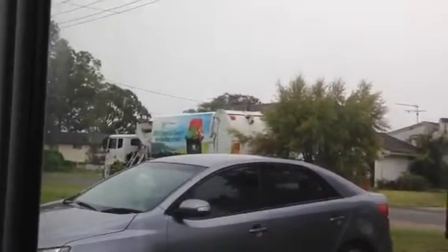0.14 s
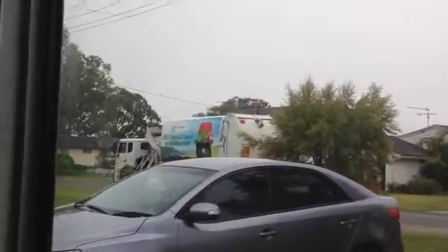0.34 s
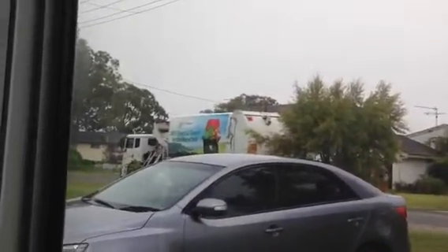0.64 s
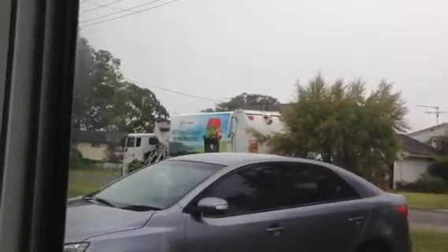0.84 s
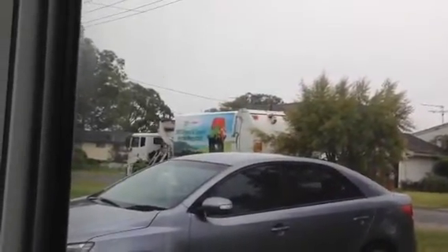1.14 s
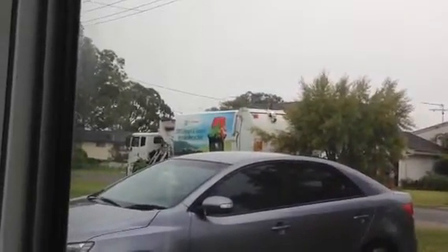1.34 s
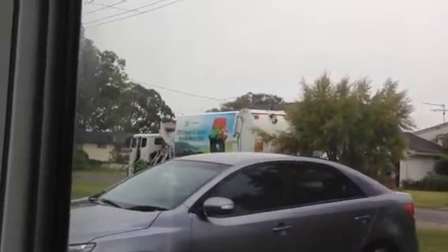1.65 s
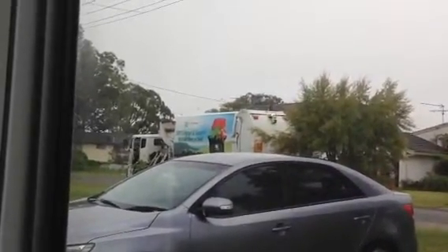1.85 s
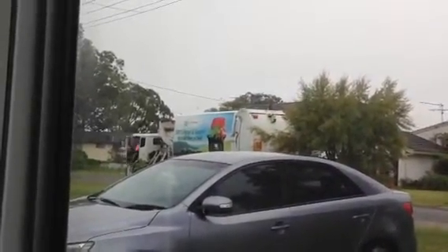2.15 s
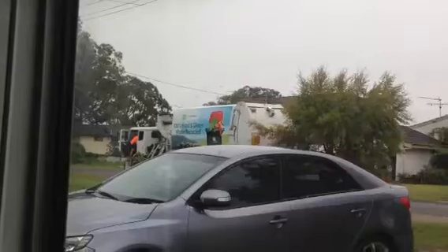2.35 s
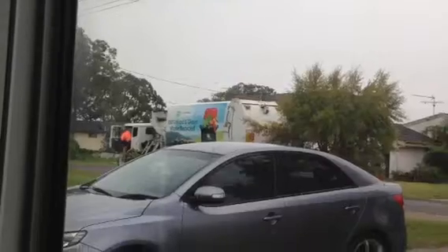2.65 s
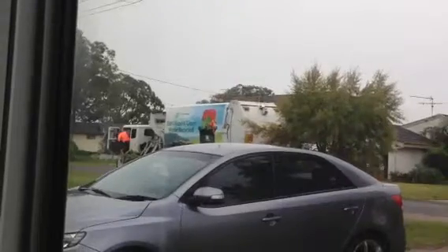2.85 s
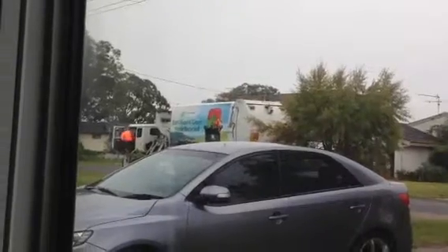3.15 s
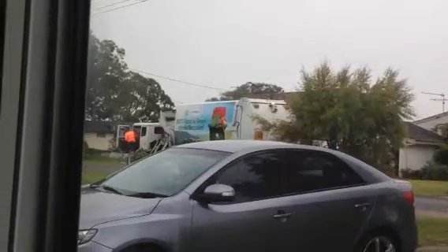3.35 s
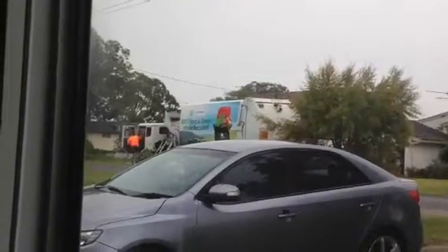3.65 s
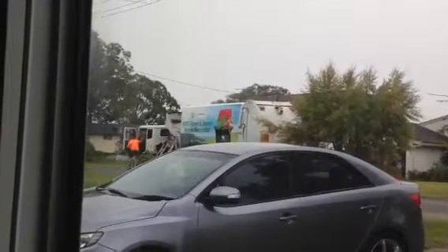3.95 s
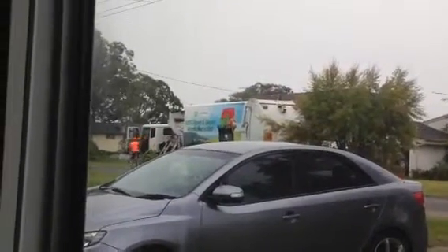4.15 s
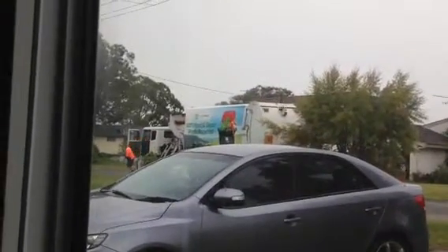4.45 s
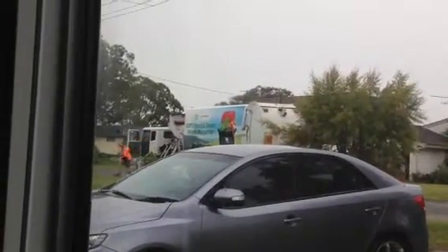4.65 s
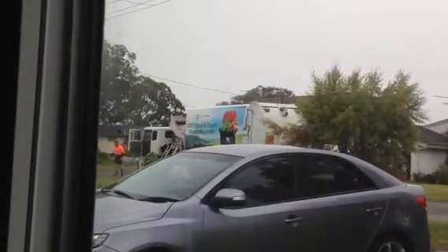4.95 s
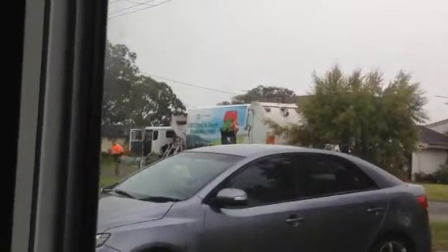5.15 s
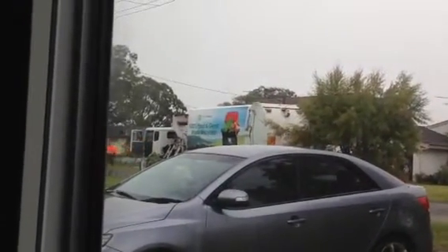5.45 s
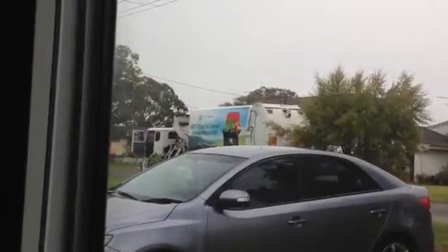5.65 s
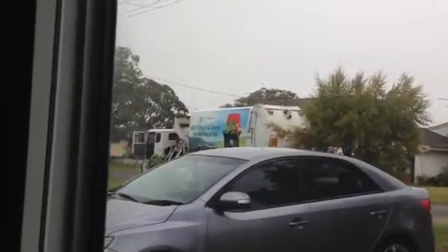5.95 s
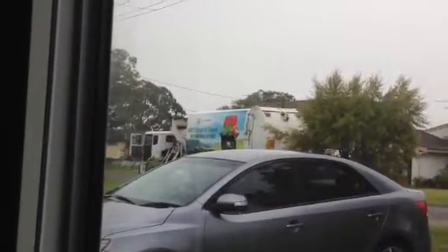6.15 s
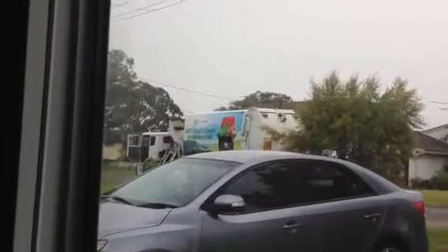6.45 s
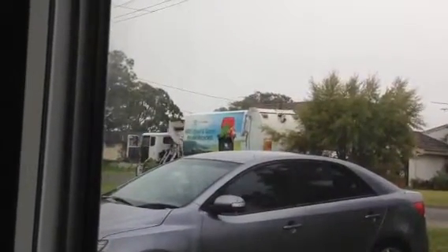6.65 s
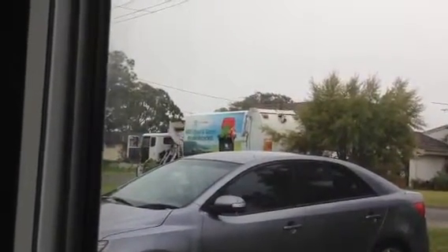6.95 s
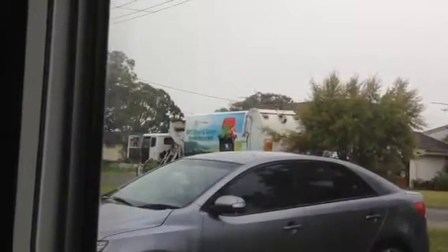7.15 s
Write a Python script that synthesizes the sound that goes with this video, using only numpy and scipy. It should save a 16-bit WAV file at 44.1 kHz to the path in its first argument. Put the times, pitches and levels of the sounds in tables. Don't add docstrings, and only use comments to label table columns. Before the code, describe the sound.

Low engine drone and fan roar, a sharp half-second blast of brake air near the start, then steady diesel idling with faint ticks and squeaks.

```python
import sys
import numpy as np
from scipy import signal
from scipy.fft import rfft, irfft, next_fast_len
from scipy.io import wavfile

SR = 44100
rng = np.random.default_rng(int(sys.argv[2]) if len(sys.argv) > 2 else 0)


def linear_from_db(decibels):
    return 10 ** (np.asarray(decibels, float) / 20)


def waveform_to_disk(signal):
    frames = np.transpose(np.atleast_2d(signal))
    scaled = np.clip(frames, -1, 1) * 32767
    samples = np.round(scaled).astype(np.int16)
    wavfile.write(sys.argv[1], SR, samples)


N = 321930
TIME = np.arange(N) / SR
SIZE = 2 * next_fast_len(N // 2 + 1)
FREQS = np.maximum(np.arange(SIZE // 2 + 1) * SR / SIZE, 1)


def rms_one(x):
    return x / np.sqrt(np.mean(x ** 2) + 1e-20)


def in_time(rows):
    s, *columns = np.transpose(rows)
    return [np.interp(TIME, s, column) for column in columns]


def drift(rate_hz):
    size = N // 30 + 1
    slowing = 1 + (np.arange(size // 2 + 1) * SR / N / rate_hz) ** 2
    slow = irfft(rfft(rng.standard_normal(size)) / slowing, size)
    return np.interp(TIME, np.linspace(0, N / SR, size), rms_one(slow))


def swells(rows, rise_db_per_s, fall_db_per_s):
    levels_db = []
    for s, hold_s, top_db in rows:
        before = np.maximum(s - TIME, 0)
        after = np.maximum(TIME - s - hold_s, 0)
        levels_db.append(top_db - rise_db_per_s * before - fall_db_per_s * after)
    return linear_from_db(np.max(levels_db, axis=0))


def colour(points, peaks):
    hz, level_db = np.transpose(points)
    db = np.interp(np.log(FREQS), np.log(hz), level_db)
    for peak_hz, width_hz, top_db in peaks:
        db = db + top_db / (1 + (2 * (FREQS - peak_hz) / width_hz) ** 2)
    return linear_from_db(db)


def band(low_hz, high_hz):
    return 1 / np.sqrt((1 + (low_hz / FREQS) ** 12) * (1 + (FREQS / high_hz) ** 12))


def noise(gain):
    return rms_one(irfft(rfft(rng.standard_normal(SIZE)) * gain, SIZE)[:N])


def wavering(hz, width_hz, rough_db):
    turns = np.cumsum(hz + width_hz * drift(47.2)) / SR
    return np.sqrt(2) * np.sin(2 * np.pi * turns) * linear_from_db(rough_db * drift(41))


def ring(clicks, hz, t60_s):
    r = linear_from_db(-60 / (t60_s * SR))
    w = 2 * np.pi * hz / SR
    return signal.lfilter([0, np.sin(w)], [1, -2 * r * np.cos(w), r * r], clicks + 1e-18)


# (delay t/s, level/dB)
ECHOES = [(.0047, -14), (.0113, -9.5), (.0191, -15), (.0307, -13.5), (0.0442, -12.5)]


def street_ripple():
    return np.abs(1 + sum(linear_from_db(db) * np.exp(-2j * np.pi * FREQS * s) for s, db in ECHOES))


# (t/s, crank turns per minute)
IDLE_SPEED = [(0.0, 837.0), (0.9, 838.4), (2.1, 847.3), (3.3, 848.9), (4.2, 846.8), (5.1, 836.1),
              (5.5, 838.4), (5.8, 869.2), (6.1, 853.1), (6.35, 862.0), (6.8, 839.3), (7.3, 844.3)]


def crank():
    first_cycle = -.09
    return first_cycle + np.cumsum(in_time(IDLE_SPEED)[0]) / SR / 120


def still_air():
    air = linear_from_db(-76) * noise(band(16, 64))
    return air + linear_from_db(-67) * noise(band(7000, 17400) / FREQS ** .6)


def looped(cycle, size=6250):
    patterns, turn = rng.standard_normal((2, size)), 1.42 * drift(0.42)
    place = ((cycle % 1) * size).astype(int)
    return np.cos(turn) * patterns[0, place] + np.sin(turn) * patterns[1, place]


# (f/Hz, level/dB per Hz)
ROAR = [(39, -27), (66, -1), (140, 0), (168, -4), (206, -9), (318, -10), (349, -9), (723, -11),
        (775, -17.5), (973, -7), (1340, -9.5), (1640, -9.5), (3110, -11), (6030, -14.5), (15400, -49)]
# (f/Hz, width/Hz, level/dB)
HOLLOWS = [(207, 25, 4), (292, 12, 4), (318, 20, -6), (422, 25, 5), (505, 30, -7), (850, 15, -5),
           (720, 25, 5), (1040, 150, 4), (1310, 30, -4), (1405, 30, -5), (1760, 35, -5), (1825, 45, 4),
           (2030, 80, 2), (2470, 40, 4), (2690, 80, -3), (2805, 50, 4), (3800, 200, 3), (4940, 60, 2),
           (5860, 60, 3), (7000, 200, 4), (7250, 300, -3), (9440, 80, 2)]


def roar(cycle):
    shape = street_ripple() ** 0.36 * colour(ROAR, HOLLOWS)
    fresh = rfft(rng.standard_normal(SIZE))
    again = rfft(looped(cycle), SIZE)
    edges_hz = [62, 130, 300, 900, 1530, 2540, 4500, 8000, 17000]
    band_levels_db = [0.58, -0.22, -1.25, -2.6, 3.47, -0.87, -1.53, 1.0]
    breathing_db = [0, 0, .3, .6, 1.4, 1.6, 1.2, .8]
    repeating = [.2, .25, .4, .35, .2, .1, .05, 0]
    out = 0
    for low, high, db, depth_db, share in zip(edges_hz, edges_hz[1:], band_levels_db, breathing_db, repeating):
        breath_db = depth_db * np.cos(4 * np.pi * (cycle - .02))
        swell = linear_from_db(db + breath_db + 0.54 * drift(3.9))
        source = np.sqrt(1 - share) * fresh + np.sqrt(share) * again
        out = out + swell * irfft(source * shape * (FREQS >= low) * (FREQS < high), SIZE)[:N]
    level_db = -47.5 + .15 * TIME
    return linear_from_db(level_db) * rms_one(out)


# (t/s, hold t/s, level/dB)
PUMP = [
    (.1, 0.092, -55),
    (.7, 0.092, -59),
    (3.0, 1.4, -61.5),
    (4.95, 0.8, -58),
    (7.0, 0.43, -57),
]


def pump():
    return swells(PUMP, 30.0, 40.0) * wavering(146.5, 1.1, rough_db=1.4)


def intake(cycle):
    breath = linear_from_db(3.0 * np.cos(4 * np.pi * (cycle - .02)))
    reed = noise(band(3825, 3885) * colour([(20, 0), (20000, 0)], [(3853, 60, 30)]))
    return swells([(1.7, 4.4, -65)], 40.0, 40.0) * breath * reed


# (t/s, f/Hz, level/dB)
TURBINE = [
    (1.8, 5790, -70),
    (3.5, 5840, -80),
    (4.8, 5970, -69),
    (5.6, 6310, -76),
    (7.3, 6176, -86),
]


def turbine():
    hz, db = in_time(TURBINE)
    return linear_from_db(db) * (TIME > TURBINE[0][0]) * wavering(hz, 19.2, rough_db=3.0)


# (t/s, level/dB)
DRONE = [(.13, -49), (.31, -53), (.56, -54), (.73, -52), (1.5, -53), (1.871, -57), (2.02, -57),
         (2.31, -53.5), (2.559, -57), (2.901, -55.5), (3.3, -56), (3.528, -53.5), (3.829, -52),
         (4.34, -56.5), (4.6, -55), (4.88, -50), (5.651, -55), (5.99, -54.5), (6.23, -51.5), (6.46, -54),
         (6.57, -58.5), (7.02, -57.5)]
# (t/s, hold t/s, level/dB)
PUFFS = [
    (5.96, 0.2, -50.5),
    (6.2, 0.13, -55),
    (6.42, 0.03, -46.5),
    (6.53, .01, -55),
]


def pipe():
    drone = swells([(s, .03, db) for s, db in DRONE], 75.0, 98.0) * wavering(208, 7.3, rough_db=2.8)
    return drone + swells(PUFFS, 400.0, 526.0) * wavering(102, 3.5, rough_db=1.5)


# (t/s, hold t/s, level/dB)
SQUEAK = [
    (5.83, .02, -51),
    (5.93, 0.018, -51),
    (6.08, .01, -59),
    (6.225, .02, -50.5),
]


def belt():
    return swells(SQUEAK, 280.0, 350.0) * wavering(2025, 20.3, rough_db=1.6)


# (t/s, peak level/dB)
CLACK = [
    (.0805, -41),
    (.0835, -36),
    (.0862, -30),
    (.0985, -40),
]


def valve_clack():
    clicks = np.zeros(N)
    for s, db in CLACK:
        clicks[round(s * SR)] = linear_from_db(db - 28)
    metal = [(2420, -2, .016), (2200, 0, .018), (1950, -1, .018), (1350, -12, .06)]   # (f/Hz, level/dB, t60/s)
    return sum(linear_from_db(db) * ring(ring(clicks, hz, t60), hz, .008) for hz, db, t60 in metal)


# (order per cycle, level/dB under the tone, lead in turns)
ORDERS = [(12, -12.5, -0.5), (14, -39, 0.16), (18, -18.5, -0.18), (24, -38, -0.57), (27, -17, -0.18),
          (30, -18.5, -0.47), (32, -23, 0.29), (33, -23, 0.47), (36, -19, -0.12), (42, -24.5, 0.29),
          (46, -48, 0.83), (48, -26, -0.054), (51, -28.5, -0.12), (52, -29, -0.44), (60, -27, 0.28),
          (84.7, -26.5, 0.057), (116, -24.5, 0.38)]


def exhaust(cycle, tone_db):
    hum = np.cos(2 * np.pi * 6 * cycle)
    waver = linear_from_db(1.0 * drift(4))
    for order, db, lead in ORDERS:
        own = np.roll(waver, 2500 * round(order))
        hum = hum + linear_from_db(db) * own * np.cos(2 * np.pi * (round(order) * cycle + lead))
    return np.sqrt(2) * linear_from_db(tone_db) * hum


# (share of cycle, level/dB into each of the four block modes, level/dB of broad tick)
CONTACTS = [(.07, 0, 4, -5, -3, -3), (.22, 3, 4, -5, -8, -4), (.32, -6, -3, -1, 1, -3),
            (.39, 3, 4, -9, -7, -2), (.44, -8, -8, 4, 6, 0), (.50, -8, -8, 6, 5, 1), (.56, 5, 3, 5, 1, -1),
            (.65, -12, -1, -2, -4, -2), (.83, -2, -8, 1, 0, -2), (.92, -12, -2, 2, 3, 2)]
# (level/dB, t60/s)
BLOCK = [
    (5.5, 0.096),
    (0.5, 0.081),
    (3, 0.077),
    (3.5, 0.072),
    (3, 0.0088),
]
BLOCK_HZ = [997, 1086, 1590, 1700, 2200]
# (order per cycle, level/dB to the clatter)
GEARS = [
    (141, -6),
    (154, -14),
    (225, -12),
    (241, -12),
]


def clatter(cycle, sump_db, head_db):
    jitter_s, uneven_db = .00005, 1.5
    table = np.tile(CONTACTS, (54, 1))
    due = table[:, 0] + np.arange(len(table)) // len(CONTACTS) - 1
    when = np.interp(due, cycle, TIME)
    luck = rng.standard_normal((len(table), 1 + len(BLOCK)))
    at = np.clip(((when + jitter_s * luck[:, 0]) * SR).astype(int), 0, N - 1)
    heard = (at > 0) & (at < N - 1)
    modes = []
    for k, (hz, (db, t60)) in enumerate(zip(BLOCK_HZ, BLOCK), 1):
        clicks = np.zeros(N)
        clicks[at] = heard * linear_from_db(db + table[:, k] + uneven_db * luck[:, k])
        modes.append(ring(ring(clicks, hz, t60), hz, .014))
    whine = []
    for order, db in GEARS:
        tone = np.sin(2 * np.pi * order * cycle + .7 * drift(4))
        whine.append(linear_from_db(db + 2.0 * drift(4)) * tone)
    sump = rms_one(sum(modes[:2])) + sum(whine[:2])
    head = rms_one(sum(modes[2:])) + sum(whine[2:])
    return linear_from_db(sump_db) * sump + linear_from_db(head_db) * head


# (t/s, firing tone level/dB, sump clatter level/dB, head clatter level/dB)
EFFORT = [(0, -45, -58.5, -59.5), (1.2, -45, -60.5, -57), (2.3, -46, -55.5, -54),
          (3.6, -46.5, -54.5, -53.5), (4.9, -45, -60, -55.5), (5.5, -44.5, -56.5, -55.5),
          (5.8, -45.5, -51, -56.5), (6.1, -47, -53, -56), (6.4, -49, -49.5, -55), (6.75, -45.5, -60, -54),
          (7.3, -45, -62, -59)]


def engine(cycle):
    tone_db, sump_db, head_db = in_time(EFFORT)
    return exhaust(cycle, tone_db) + clatter(cycle, sump_db - 1.0, head_db + 0.18)


# (t/s, hold t/s, level/dB)
SEEP = [
    (.08, 0.018, -45),
    (.25, 0.026, -48),
    (.42, .18, -52),
]
# (t/s, hold t/s, level/dB)
SPIT = [
    (.42, .01, -55),
    (.75, .08, -61.5),
]


def brake_leaks():
    out = swells(SEEP, 160.0, 230.0) * noise(band(1930, 1950.0))
    out += swells(SPIT, 400.0, 75.0) * noise(band(3060.0, 11000) / FREQS)
    start_s = 1.46
    whistle_hz = 1912 + 12 * (TIME - start_s)
    out += swells([(start_s, 1.2, -55)], 80.0, 250.0) * wavering(whistle_hz, 5, rough_db=1.8)
    return out


# (f/Hz, level/dB per Hz)
JET = [(150, -39), (250, -2), (287, 8), (335, -3), (534, -20), (728, -26), (959, -24.5), (1140, -29.5),
       (1750, -13.5), (2430, -6.5), (2940, -11.5), (3430, -2), (5950, -2.5), (9810, -6), (15400, -19)]
# (f/Hz, width/Hz, level/dB)
NOZZLE = [(1810, 60, 3), (2350, 150, 4), (3550, 120, 2), (4150, 300, 2), (5950, 400, 3)]
# (t/s, level/dB)
VALVE = [
    (.80, -65),
    (.845, -42),
    (.866, -22),
    (.895, -19.5),
    (.98, -23.5),
    (1.005, -18),
    (1.22, -19),
    (1.345, -21.5),
    (1.39, -35),
]
# (share level/dB, change as tank empties dB/s, answer to sizzle dB, dying after shut-off dB/s)
JET_PARTS = [
    (-8, -0.5, 1.5, 32),
    (-6, 3.5, -5.5, 59),
    (-5, -4.5, 5, 70),
    (-6, -8.5, -1, 68),
]
# (t/s, hold t/s, level/dB)
PANEL = [
    (.90, 0.04, -30),
    (1.025, 0.0082, -32),
    (1.075, .065, -34),
    (1.2, 0.023, -29.5),
    (1.3, 0.036, -49),
    (1.45, 0.046, -45),
]
# (t/s, hold t/s, level/dB)
SURGES = [
    (.93, 0.0091, -37),
    (1.06, 0.011, -48),
    (1.235, 0.011, -39.5),
    (1.375, 0.0092, -41.5),
]


def brake():
    flow_db, = in_time(VALVE)
    opened = TIME - VALVE[0][0]
    shut = np.maximum(TIME - VALVE[-1][0], 0)
    flow_db = flow_db + 300.0 * np.minimum(opened, 0)
    sizzle = np.exp(-((TIME - 1.3) / 0.047) ** 2)
    shape = street_ripple() * colour(JET, NOZZLE)
    edges_hz = [1400, 2900, 5000, 7200, 17000]
    jet = swells([(1.46, 0.23, -55.5)], 300.0, 200.0) * noise(shape * band(3000, 17000))
    for part, low, high in zip(JET_PARTS, edges_hz, edges_hz[1:]):
        share_db, tilt_db, shift_db, dying_db = part
        db = flow_db + share_db + tilt_db * (opened - shut) + shift_db * sizzle - dying_db * shut
        jet += linear_from_db(db) * noise(shape * band(low, high))
    flow = linear_from_db(flow_db - 60.0 * shut)
    surge = swells(SURGES, 306.0, 320.0)
    thrum = swells(PANEL, 600.0, 350.0) * wavering(199, 7, rough_db=1.2)
    thrum += linear_from_db(-19) * flow * noise(band(124, 230))
    thrum += (linear_from_db(-28) * flow + linear_from_db(-14.0) * surge) * noise(shape * band(220, 400))
    thrum += (linear_from_db(-24.5) * flow + surge) * noise(shape * band(508, 1556))
    return linear_from_db(.5 * drift(25)) * jet + thrum


def scene():
    cycle = crank()
    mix = still_air() + roar(cycle)
    mix += pump() + intake(cycle) + turbine()
    mix += pipe() + belt() + valve_clack()
    mix += engine(cycle)
    mix += brake_leaks() + brake()
    return np.tile(mix, (2, 1))


def band_limit(x):
    return signal.sosfilt(signal.butter(12, 15320, fs=SR, output="sos"), x)


# (t/s, low f/Hz, high f/Hz)
SPREAD = [(1.167, 6200, 9100), (1.167, 9600, 11200), (1.260, 8300, 9800), (2.397, 11700, 13100),
          (3.326, 9600, 11200), (3.953, 4150, 5800), (4.928, 5150, 6900), (5.091, 4650, 5800),
          (5.950, 4650, 5800), (6.716, 4150, 5250), (6.716, 6200, 7700), (7.157, 4150, 5250),
          (7.157, 12400, 13800)]


def record(dry):
    side = np.zeros(N)
    window = np.sin(np.pi * (np.arange(2048) + .5) / 2048)
    hz = np.arange(1025) * SR / 2048
    for s, low, high in SPREAD:
        start = round(s * SR) - 1024
        piece = rfft(dry[0, start:start + 2048] * window) * (hz > low) * (hz < high)
        scrambled = piece * np.exp(2j * np.pi * rng.random(1025))
        side[start:start + 2048] += linear_from_db(0.5) * window * irfft(scrambled)
    return band_limit(dry + side * [[1], [-1]])


dry = scene()
out = record(dry)
waveform_to_disk(out)
```